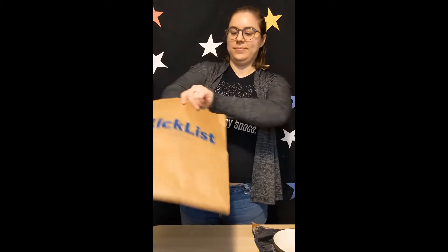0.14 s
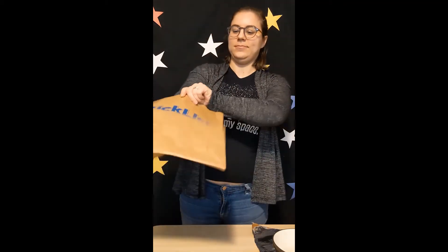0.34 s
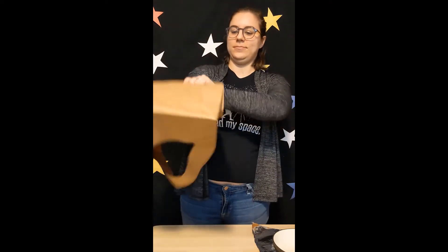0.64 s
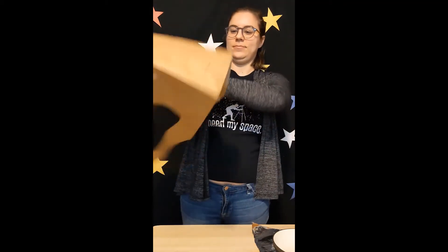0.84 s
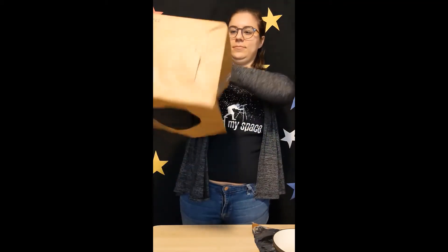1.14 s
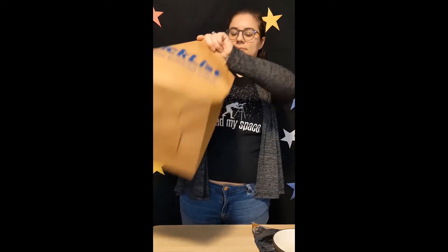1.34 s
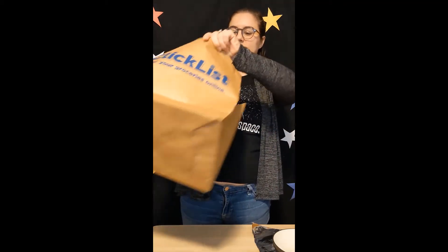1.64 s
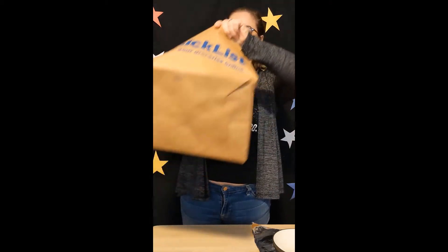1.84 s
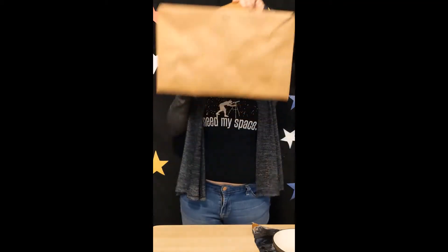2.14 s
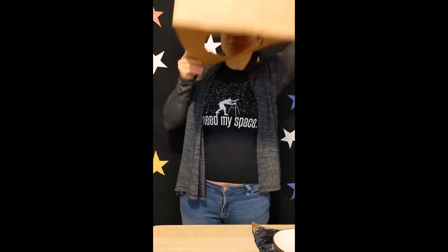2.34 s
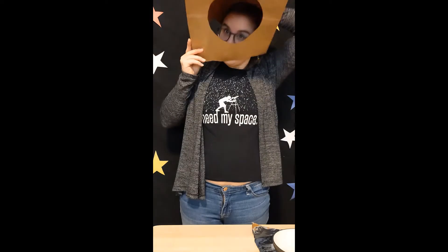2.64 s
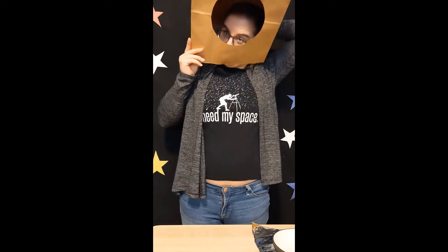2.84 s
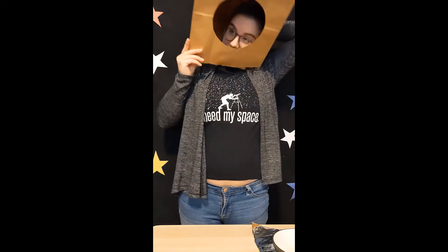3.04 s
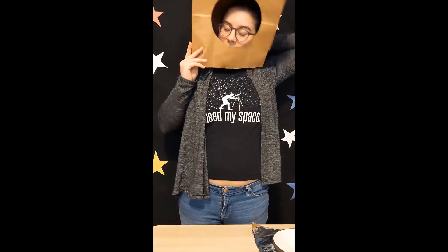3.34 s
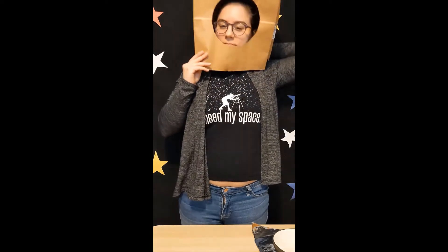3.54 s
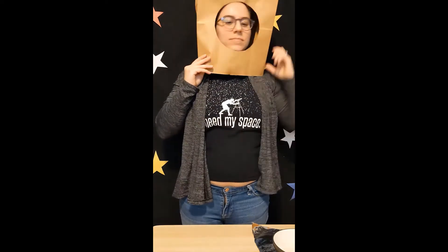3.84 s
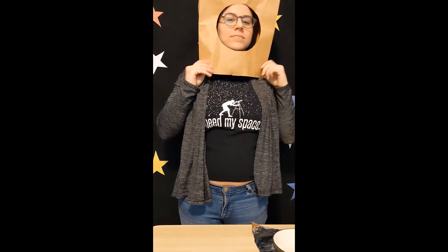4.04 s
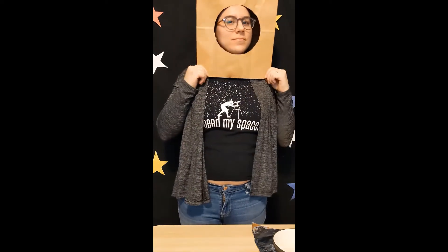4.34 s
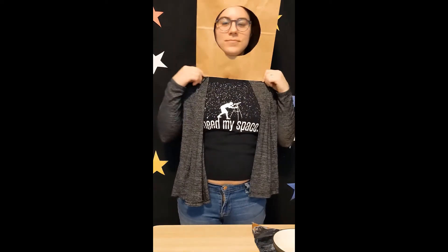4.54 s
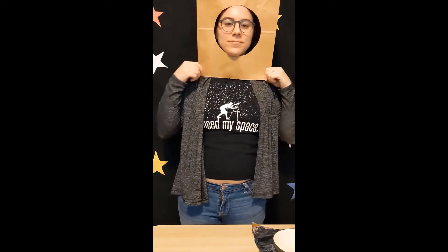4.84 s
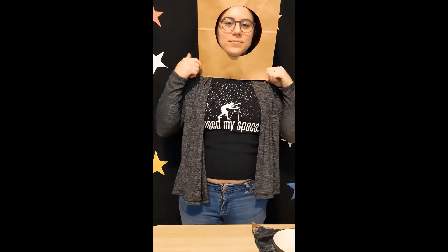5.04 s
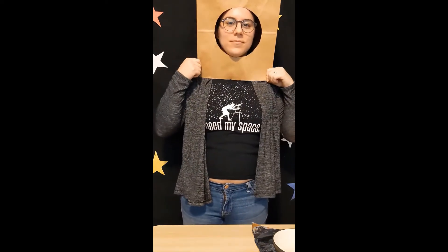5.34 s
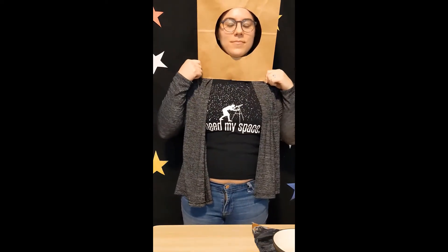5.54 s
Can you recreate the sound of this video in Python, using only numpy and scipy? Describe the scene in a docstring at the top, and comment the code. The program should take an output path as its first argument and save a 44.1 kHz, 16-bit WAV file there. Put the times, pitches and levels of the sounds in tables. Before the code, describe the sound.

In a small, quiet room, a paper bag crackles and buckles in quick clumps, its hollow walls popping and fanning a little air at the stereo microphone. After a lighter stretch, the paper snaps sharply again and drags over hair and cloth. Rustling strokes and weaker snaps continue as the bag is tugged into place, fading toward the end.

```python
"""A stiff paper bag is lifted, turned over and pulled down over a head in a small room.
First 1.3 s: panels buckle in dense clumps of snaps, creases crackle, walls pop and drum.
Sparser from there; near 3 s, a burst of snaps and a swish of paper on hair and cloth.
Then sliding strokes and weaker snaps to the end. Throughout, the hollow bag and the room ring
along, heard by two microphone ports a hand apart."""
import sys
import numpy as np
from scipy import signal
from scipy.fft import rfft, irfft
from scipy.io import wavfile
from scipy.ndimage import uniform_filter1d

SR = 44100
rng = np.random.default_rng(int(sys.argv[2]) if len(sys.argv) > 2 else 0)


def dump_mix(stems):
    """Bounce the given channels to the path in sys.argv[1] as a 16-bit WAV at rate SR."""
    frames = np.atleast_2d(stems).T  # one column per channel
    limited = np.clip(frames, -1, 1)  # hard clip at full scale
    pcm = np.round(limited * 32767).astype(np.int16)
    wavfile.write(sys.argv[1], SR, pcm)


N = 250796
PORT_LAG_SAMPLES = 20  # left port behind right


def buckles(slips_per_s=1500, spread_db=1.5, panel_q=4.14, first_slip=0.96):
    """Buckling panels: a first slip, a dying clump, a brief ring. Returns boom, snap, crack trains."""
    # t/s, snap level/dB, boom re snap/dB, crack re snap/dB, clump decay/s, panel f/Hz
    events = [(0.078, -42, 5, -10, 0.021, 480), (0.1, -30, -20, -8, 0.011, 870),
              (0.186, -52, -19, 8, 0.0048, 594), (0.276, -33.5, 1, -4, 0.007, 605),
              (0.286, -21.5, -12, -8, 0.008, 1750), (0.364, -33.5, -11, -15, 0.03, 1080),
              (0.398, -30.5, -7.5, -7.5, 0.0077, 1290), (0.418, -25, -4, -5.5, 0.0048, 2790),
              (0.432, -27.5, -12.5, -29, 0.0099, 570), (0.489, -35.5, -5.5, -37, 0.013, 505),
              (0.574, -31.5, -23, -3.5, 0.0082, 1110), (0.636, -36, -17, -11, 0.0099, 1090),
              (0.666, -29.5, -4, -10.5, 0.014, 1030), (0.727, -25, -12.5, -7.5, 0.0088, 1320),
              (0.782, -27.5, -17, -12, 0.019, 1160), (0.845, -27, -12, -9, 0.0098, 1080),
              (0.88, -25.5, -17, -13.5, 0.0079, 2540), (0.939, -24.5, -3.5, -13.5, 0.01, 540),
              (0.96, -29.5, -11, -20.5, 0.017, 1040), (1.048, -29, -18, -19, 0.013, 810),
              (1.07, -25, -24, -5, 0.0089, 740), (1.093, -26, -13, -12.5, 0.028, 854),
              (1.149, -25, -8.5, -4.5, 0.0099, 754), (1.207, -20, -12, -14, 0.017, 590),
              (1.243, -23.5, -30, -3.5, 0.012, 1450), (1.344, -26.5, -34.5, -29, 0.0055, 710),
              (1.447, -21.5, -14.5, -14.5, 0.0038, 750), (1.538, -41, -3.5, -5, 0.0092, 1890),
              (1.688, -33.5, -24.5, -7, 0.0093, 570), (1.699, -25, -9.5, -13, 0.018, 814),
              (1.742, -24.5, -12, -22.5, 0.0057, 570), (1.857, -32, -27, -34, 0.0093, 520),
              (1.973, -48.5, 3, -10.5, 0.027, 515), (2.045, -44, -18, -11, 0.015, 550),
              (2.345, -44.5, -5, -34, 0.015, 587), (2.373, -30, -18.5, -14, 0.012, 940),
              (2.531, -52.5, 3.5, -8.5, 0.01, 625), (2.652, -41.5, -7.5, -4.5, 0.007, 1220),
              (2.776, -32, -12, -30, 0.0069, 694), (2.815, -40.5, 1.5, -19, 0.008, 810),
              (2.856, -23.5, -11.5, -16, 0.0098, 820), (2.957, -27, -6.5, -1.5, 0.016, 2470),
              (2.978, -17.5, -14.5, -11, 0.012, 2300), (3.211, -40.5, -7, -26, 0.0068, 880),
              (3.395, -54.5, 1, -14, 0.027, 1340), (3.595, -35.5, -3.5, -8.5, 0.012, 1860),
              (3.659, -31.5, -12, -30, 0.0071, 870), (3.858, -25, -16, -7.5, 0.0054, 1270),
              (3.949, -39.5, -11, -2, 0.0095, 1830), (4.115, -33.5, -9.5, -3, 0.0037, 1780),
              (4.243, -37, -10, -8, 0.0067, 660), (4.379, -32.5, -15, -28.5, 0.0073, 1590),
              (4.508, -38, -8.5, -9.5, 0.016, 1000), (4.6, -44.5, -15, -3.5, 0.01, 670),
              (4.661, -37.5, 2, -37, 0.006, 850), (4.864, -43.5, -0.5, -15, 0.02, 850),
              (4.973, -53, 4, -1, 0.0067, 1170), (5.188, -63.5, 3, -11, 0.0071, 1880),
              (5.251, -40.5, -8, -14, 0.0063, 620), (5.322, -56.5, 4.5, -10, 0.01, 640),
              (5.621, -52, 3.5, 1, 0.0052, 650)]
    trains, t = np.zeros((3, N + 4000)), np.arange(4000) / SR
    for at_s, db, boom_db, crack_db, decay_s, hz in events:
        chance, size, sign = rng.random((3, 4000))
        sizes = gain_of(-spread_db * np.log(size + 0.015))
        slips = (chance < slips_per_s / SR) * sizes * np.sign(sign - .5) * np.exp(-t / decay_s)
        slips = slips / np.linalg.norm(slips + 1e-9)
        slips[0] = first_slip
        ring_db = -11 - 0.61 * (db + 35)  # louder snap, smaller share of ring
        panel = signal.lfilter(*signal.iirpeak(hz, panel_q, SR), slips) * gain_of(ring_db) * panel_q
        clump = gain_of([[db + boom_db], [db], [db + crack_db]]) * [slips, slips + panel, slips]
        trains[:, round(at_s * SR):][:, :4000] += clump * np.sqrt(decay_s * SR)
    return trains[:, :N]


def creases(folds_per_s=900, spread_db=4.5, crack_db=-8.0):
    """Random small folds, a few large. Returns boom, snap, crack trains."""
    chance, size, sign = rng.random((3, N))
    sizes = gain_of(-spread_db * np.log(size + 0.0057))
    folds = unit_rms((chance < folds_per_s / SR) * sizes * np.sign(sign - .5))
    crackle = stroke_gain("crackle", grip_offset_db=0)
    return folds * [gain_of(hold_db("flex")), crackle, crackle * gain_of(crack_db)]


def paper(trains, split_hz=(474, 3000)):
    """Boom (low), snap (mid) and crack (high) trains ring the sheet and the hollow of the bag."""
    # snap spectrum: f/Hz, level/dB
    sheet = [(18, -50), (35, -15), (100, -6), (145, -4), (250, 3.5), (320, 0), (500, -4), (760, -5),
             (1500, -6.5), (3200, -9), (5400, -12.5), (9000, -23), (15800, -45.5)]
    # air modes in the bag: f/Hz, width/Hz, level re sheet/dB
    hollow = [(141.8, 15.5, 8), (239, 130, -5.5), (555, 64, 0), (740.6, 30, 3.5), (2320, 140, -0.5)]
    hz = np.fft.rfftfreq(8192, 1 / SR)
    modes_db = sum(db / (1 + (2 * (hz - f) / width) ** 2) for f, width, db in hollow)
    bag_db = at_hz(sheet, hz) + modes_db
    below_snap, below_crack = (1 / (1 + (hz / f) ** 4) for f in split_hz)
    bands = [below_snap, below_crack * (1 - below_snap), 1 - below_crack]
    responses = [min_phase(bag_db + 20 * np.log10(band + 1e-6)) for band in bands]
    return sum(signal.oaconvolve(train, response)[:N] for train, response in zip(trains, responses))


def wall_pops(rise_s=0.0027):
    """A whole wall pops in or out: one dying drum tone, soft onset."""
    # t/s, level/dB, f/Hz, t60/s
    events = [(.939, -15, 578, 0.073), (1.092, -30.5, 151, 0.47), (1.10, -30, 752, .1),
              (1.203, -26, 152, 0.2), (2.005, -43, 250, 0.04), (2.345, -31.5, 736, 0.16),
              (2.385, -36, 796, 0.11), (2.86, -35, 814, 0.073), (3.86, -25.5, 365, 0.062),
              (4.60, -38.5, 755, 0.21), (4.660, -37, 709, 0.091), (4.981, -41, 137, 0.092),
              (5.324, -37, 275, 0.11)]
    out, t = np.zeros(N + 9000), np.arange(9000) / SR
    onset = 1 - np.exp(-t / rise_s)
    for at_s, db, hz, t60_s in events:
        out[round(at_s * SR):][:9000] += gain_of(db - 60 * t / t60_s) * np.sin(2 * np.pi * hz * t) * onset
    return out[:N]


def crease_ticks(decay_cycles=2.4, edge=.45):
    """Single creases flip: a bare edge and a short ring, right port first."""
    # t/s, level/dB, f/Hz, left minus right/dB
    events = [(0.2795, -40, 4390, -4.0), (0.4179, -44, 4430, -3.5), (0.5746, -48, 5210, -1.0),
              (0.6285, -33, 6810, -12), (0.727, -17.5, 5910, -11), (0.7384, -35, 6500, 1.0),
              (0.7894, -31, 5020, -5), (0.88, -19.5, 5800, -10), (0.8874, -29, 4200, 0),
              (0.9388, -28, 4520, -5.0), (1.069, -25, 5250, -10), (1.146, -24, 4550, 1),
              (1.242, -21, 4220, -7), (1.685, -33, 4440, -16), (1.697, -26, 5800, -7),
              (2.375, -38, 4830, -6), (2.7747, -45, 4700, -3.0), (2.8586, -24, 4340, -11),
              (2.9594, -19.5, 4160, -14.5), (3.394, -37, 7100, -3.5), (3.5987, -49, 4460, -3.0),
              (3.862, -34, 4220, -2.5), (4.115, -34, 4320, -17)]
    out, t = np.zeros((2, N + 300)), np.arange(200) / SR
    for at_s, db, hz, pan_db in events:
        tick = np.sin(2 * np.pi * hz * t) * np.exp(-t * hz / decay_cycles)
        tick[:2] += edge * np.array([1, -1])
        for port, (lag, side) in enumerate([(PORT_LAG_SAMPLES, .5), (0, -.5)]):
            out[port, round(at_s * SR) + lag:][:200] += gain_of(db + side * pan_db) * tick
    return out[:, :N]


def slide(grit_db=1.0):
    """Paper drags on hair and cloth: fine hiss, gritty flicker."""
    # hiss spectrum: f/Hz, level/dB
    hiss = [(180, -38), (300, -29.5), (928, -34), (975, -44), (1270, -32), (1340, -37.5), (1450, -43),
            (3170, -3.5), (7500, -1.5), (12000, -6.5), (15800, -10.5)]
    grit = unit_rms(uniform_filter1d(rng.standard_normal(N), size=90))
    return diffuse_noise(hiss) * stroke_gain("hiss", grip_offset_db=-5.5) * gain_of(grit_db * grit)


def stroke_gain(layer, grip_offset_db, shortest_s=.005):
    """Hiss or crackle gain: steady grip plus tugs and swishes, summed in power."""
    # peak t/s, hiss level/dB, crackle level/dB, 20 dB rise/s, 20 dB fade/s
    strokes = [(0.0, -62, -32.5, .05, 0.03), (.285, -50, -48, 0.14, -0.3), (.425, -52.5, -41, 0.08, 0),
               (.58, -50, -43, 0.43, -0.16), (.66, -46.5, -41, -0.1, 0.1), (.73, -48, -37.5, 0.13, 0.05),
               (.86, -49.5, -38, 0.24, 0.05), (1.09, -47, -43, 0.3, 0.16), (1.26, -54, -32, .07, 0.1445),
               (1.39, -51.5, -61, 0.1, 0.1), (1.56, -49.5, -53, 0.2, .07), (1.722, -52, -41, 0.04, 0.09),
               (1.87, -76.5, -52.5, 0.36, 0.28), (1.98, -56, -52, .02, .2), (2.05, -55.5, -53, 0.2, .15),
               (2.17, -54.5, -54.5, 0.07, 0.05), (2.52, -56.5, -57, 0.3, 0.4),
               (2.75, -51.5, -49.5, 0.34, 0.24), (2.91, -66, -47, 0.3, 0.2), (2.97, -40, -49, 0, 0.06),
               (3.23, -51, -53.5, 0.2, 0.15), (3.396, -48, -50, 0.07, 0.25), (3.629, -44, -40, 0.16, 0.08),
               (3.865, -56.5, -52, 0.26, 0.7), (4.17, -50.5, -49, 0.28, 0.3), (4.51, -54, -61, 0.2, 0.18),
               (4.61, -54, -57, .07, .1), (4.871, -56.5, -51, 0.1, 0.1), (4.985, -58, -75, 0.02, -0.02),
               (5.19, -67.5, -69, 0.05, 0.3), (5.255, -57, -69, -0.05, 0), (5.35, -60, -57, 0.1, 0.26),
               (5.64, -58.5, -55.5, 0.33, .15)]
    t = np.arange(N) / SR
    power = gain_of(hold_db("grip") + grip_offset_db) ** 2
    for peak_s, hiss_db, crackle_db, rise_s, fade_s in strokes:
        peak_db = {"hiss": hiss_db, "crackle": crackle_db}[layer]
        late_s = t - peak_s
        drop_db = 20 * np.maximum(-late_s / max(rise_s, shortest_s), late_s / max(fade_s, shortest_s))
        power += gain_of(peak_db - drop_db) ** 2
    return np.sqrt(power)


def hold_db(curve):
    """The hands' steady hold: one control curve, per sample."""
    # t/s, grip level/dB, low flexing level/dB, bag drift as left minus right/dB
    hold = [(0.0, -51, -45, -4), (0.16, -53, -66, -3.5), (0.3, -58, -52, -3), (0.7, -55, -52, -2.5),
            (0.86, -55, -44.5, -4), (1.14, -59, -42, -4), (1.4, -57, -52.5, -3), (1.66, -84, -60, -3),
            (1.73, -59, -50, -3), (2.0, -56.5, -48, -2.5), (2.3, -63.5, -74, -2.5),
            (2.72, -58.5, -52.5, -3.5), (3.1, -56, -66, -2), (3.6, -54.5, -55, -3), (3.95, -63, -65.5, -3),
            (4.45, -55, -57.5, -2.5), (4.72, -63.5, -61, -2.5), (5.0, -65.5, -71, -3), (5.16, -84, -74, -3),
            (5.42, -64.5, -60.5, -2.5), (5.69, -62, -76, -2.5)]
    at_s, grip, flex, drift = np.transpose(hold)
    return np.interp(np.arange(N) / SR, at_s, {"grip": grip, "flex": flex, "drift": drift}[curve])


def room(source, onset_s=0.0022, bend_s=0.28, turn_hz=6.0):
    """Diffuse tails, dying per band, faster late on; the moving bag meets three tails in turn."""
    # room decay: f/Hz, t60/s
    decay = [(100, 0.23), (400, 0.32), (1000, 0.26), (2800, 0.24), (7000, 0.23), (14000, 0.062)]
    out, turn_rad = np.zeros((2, N)), np.arange(N) / SR * 2 * np.pi * turn_hz
    for k in range(3):
        white = diffuse_noise([(1, 0), (2, 0)], count=SR // 2)
        hz, t, spectra = signal.stft(white, SR, nperseg=256)
        fall_db = -60 * t / at_hz(decay, hz)[:, None] - 20 * (t / bend_s) ** 2
        tail = signal.istft(spectra * gain_of(fall_db), SR, nperseg=256)[1]
        tail *= 1 - np.exp(-np.arange(tail.shape[1]) / SR / onset_s)
        tail /= np.linalg.norm(tail[0])
        crossfade = np.sqrt(2 / 3) * np.cos(turn_rad + k * np.pi / 3)
        out += signal.oaconvolve((source * crossfade)[None], tail, axes=1)[:, :N]
    return out


def draught(db_per_flex_db=0.63):
    """The swinging bag fans low, lumpy air at each port separately."""
    # draught spectrum: f/Hz, level/dB
    spectrum = [(20, -18), (35, -16), (70, 8), (95, -5), (130, -26), (200, -53)]
    colour = gain_of(at_hz(spectrum, np.fft.rfftfreq(N, 1 / SR)))
    air = unit_rms(irfft(rfft(rng.standard_normal((2, N))) * colour, N))
    return air * gain_of(-35.0 + db_per_flex_db * uniform_filter1d(hold_db("flex"), size=4000))


def still_air(level_db=-71):
    """Steady diffuse noise of the still room."""
    # noise spectrum: f/Hz, level/dB
    spectrum = [(15, -30), (25, -1), (145, -5), (426, -38), (500, -25), (588, -21), (750, -8), (6330, -13),
                (15800, -26.5)]
    return gain_of(level_db) * diffuse_noise(spectrum)


def diffuse_noise(spectrum, count=N):
    """Two-port noise, alike in the bass, rms 1."""
    # room coherence of the ports: f/Hz, coherence/1
    coherence = [(60, 1), (130, 0.72), (290, 0.69), (640, 0.25), (1400, 0.02), (4000, 0.01)]
    hz = np.fft.rfftfreq(count, 1 / SR)
    left, independent = rfft(rng.standard_normal((2, count)))
    alike = at_hz(coherence, hz)
    right = alike * left + np.sqrt(1 - alike ** 2) * independent
    return unit_rms(irfft(np.array([left, right]) * gain_of(at_hz(spectrum, hz)), count))


def min_phase(db):
    """Minimum-phase impulse response of a spectrum, energy 1."""
    log_gain = np.log(gain_of(np.maximum(db - db.max(), -100)))
    mirrored = np.r_[log_gain, log_gain[-2:0:-1]]
    response = np.fft.ifft(np.exp(np.conj(signal.hilbert(mirrored)))).real[:4096]
    return response / np.linalg.norm(response)


def at_hz(table, hz):
    """Table value on a log-frequency axis."""
    f, value = np.transpose(table)
    return np.interp(np.log(hz + 1), np.log(f + 1), value)


def gain_of(db):
    """dB to amplitude."""
    return 10 ** (np.asarray(db) / 20)


def unit_rms(x):
    """Scale to rms 1."""
    return x / np.sqrt(np.mean(x ** 2) + 1e-20)


def scene():
    """Direct sound, right port first; then room, draught and still air."""
    bag = paper(gain_of(-7.0) * buckles() + gain_of(-3.0) * creases())
    pops, ticks = wall_pops(), crease_ticks()
    right = bag + pops
    left = np.r_[np.zeros(PORT_LAG_SAMPLES), right[:-PORT_LAG_SAMPLES]]
    reverb = room(bag + gain_of(-7.0) * pops + gain_of(-9.5) * ticks[1])
    bag_in_room = gain_of(-7.0) * np.array([left, right]) + gain_of(-2.0) * reverb + slide()
    drift = gain_of(np.outer([.5, -.5], hold_db("drift")))
    return bag_in_room * drift + ticks + still_air() + draught()


def record(dry, cutoff_hz=15860):
    """The microphone body shades the ports unevenly by frequency; then a low-pass."""
    # port shading: f/Hz, left minus right/dB
    shading = [(60, 0), (110, 2), (200, 1.5), (380, 3.5), (700, -0.5), (1290, 2), (2380, 0.5), (4400, 1.5),
               (8120, 1.5), (15000, -1.5)]
    shade_db = at_hz(shading, np.fft.rfftfreq(N, 1 / SR))
    shaded = irfft(rfft(dry) * gain_of(np.outer([.5, -.5], shade_db)), N)
    lowpass = signal.firwin(511, cutoff_hz, window=("kaiser", 9), fs=SR)
    return signal.oaconvolve(shaded, lowpass[None], "same")


dry = scene()
out = record(dry)
dump_mix(out)
```